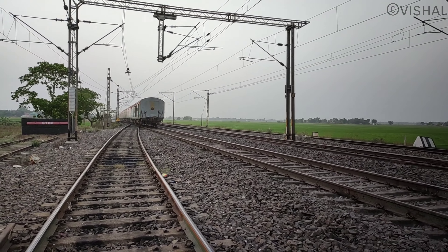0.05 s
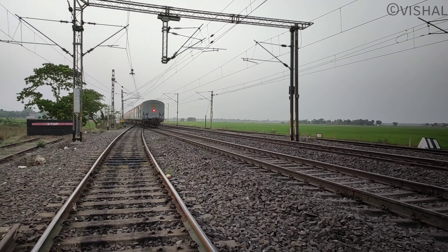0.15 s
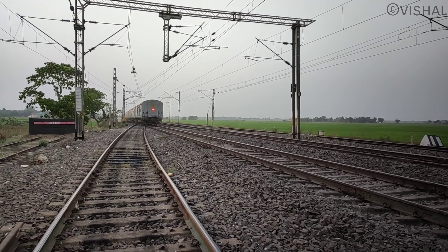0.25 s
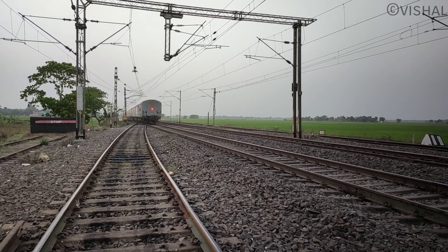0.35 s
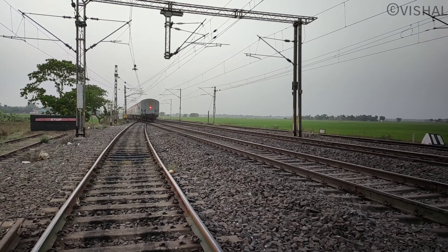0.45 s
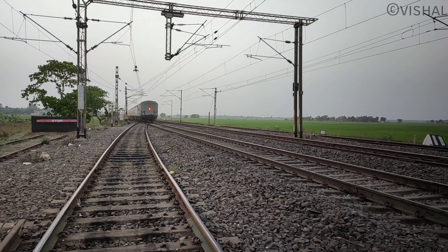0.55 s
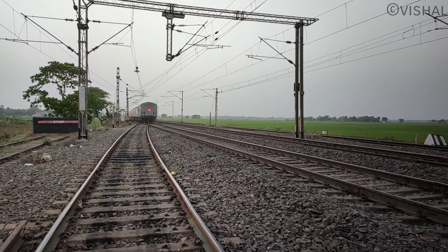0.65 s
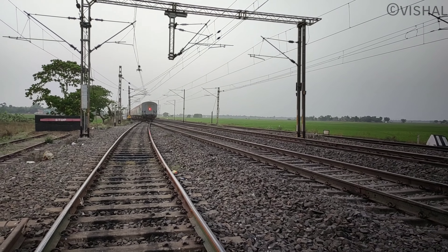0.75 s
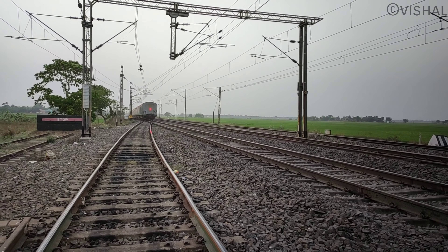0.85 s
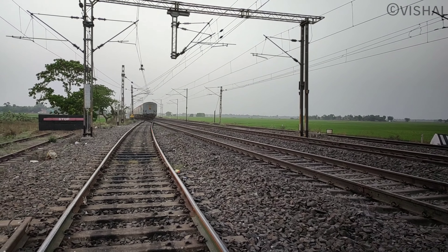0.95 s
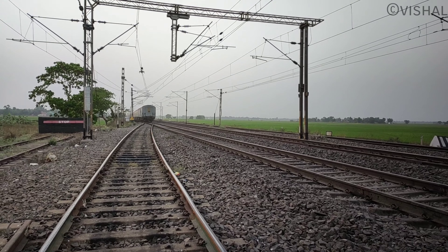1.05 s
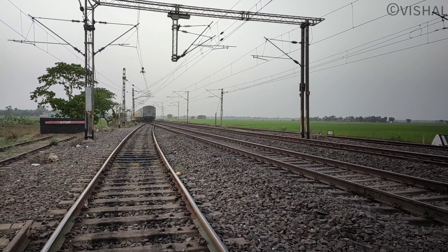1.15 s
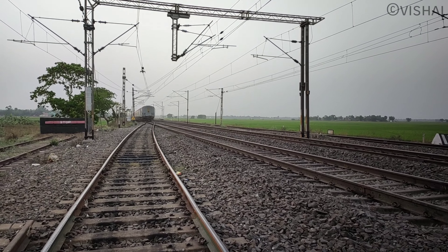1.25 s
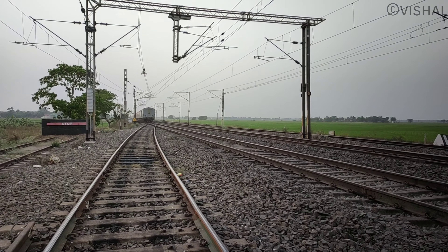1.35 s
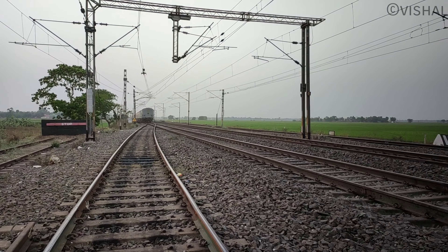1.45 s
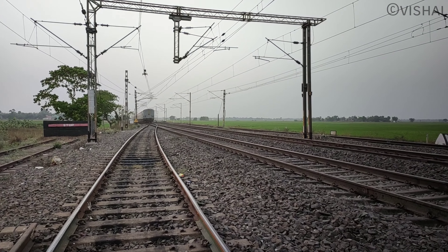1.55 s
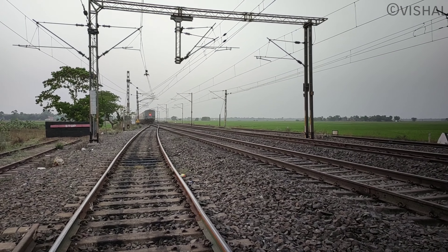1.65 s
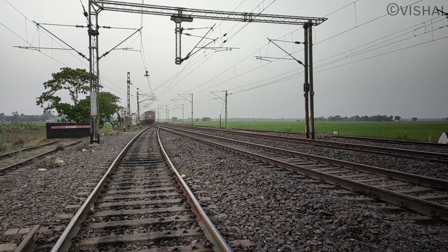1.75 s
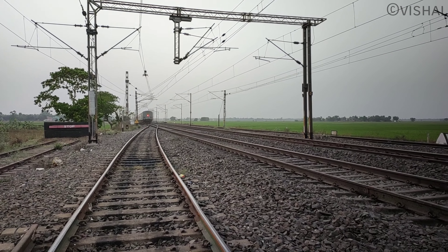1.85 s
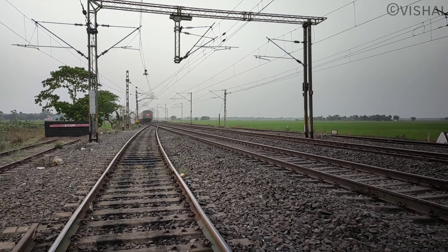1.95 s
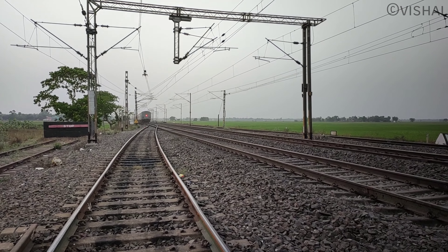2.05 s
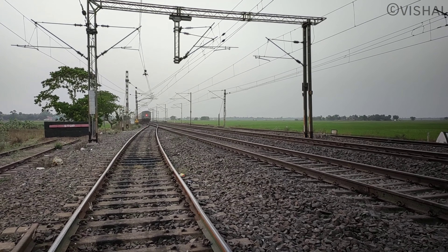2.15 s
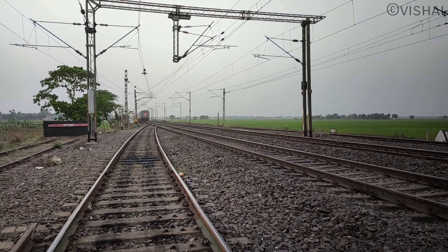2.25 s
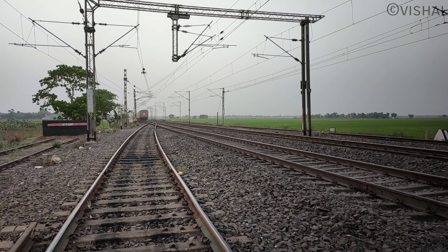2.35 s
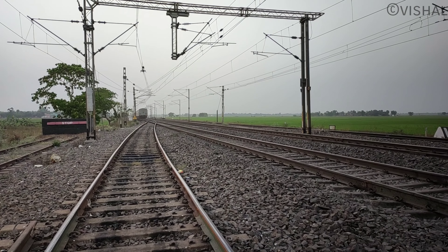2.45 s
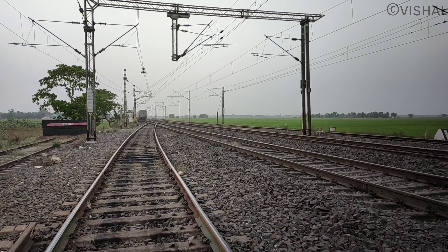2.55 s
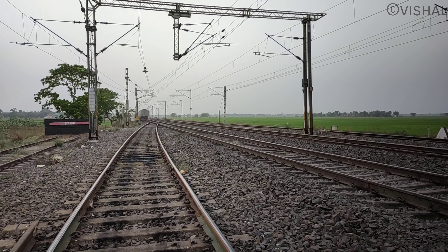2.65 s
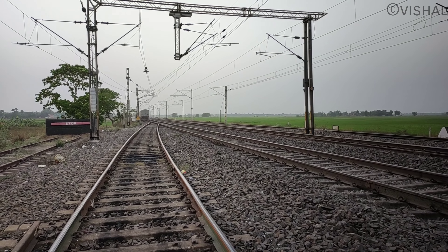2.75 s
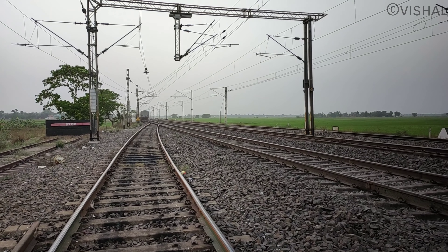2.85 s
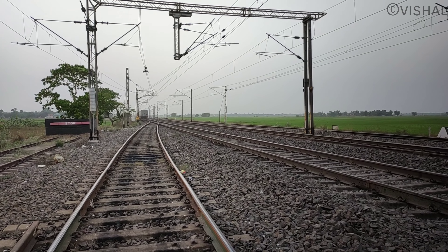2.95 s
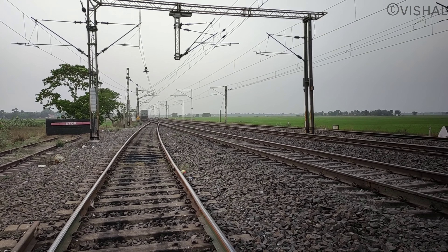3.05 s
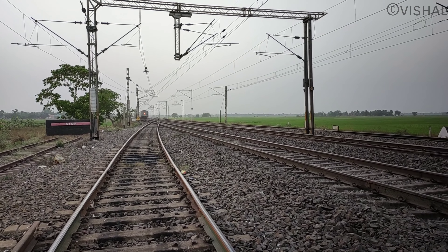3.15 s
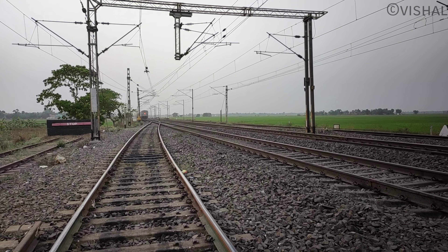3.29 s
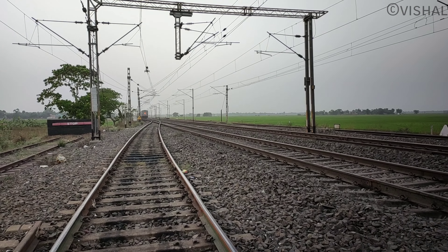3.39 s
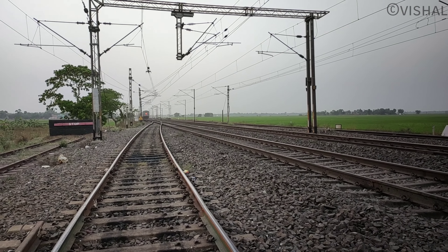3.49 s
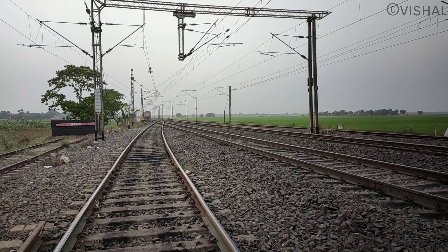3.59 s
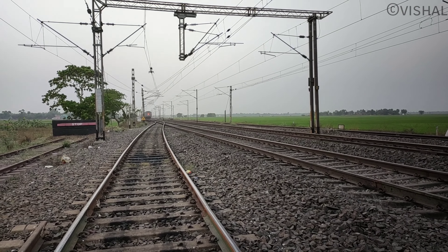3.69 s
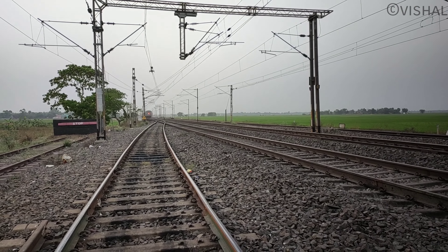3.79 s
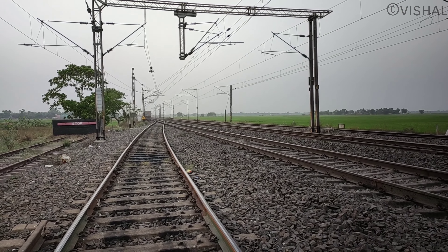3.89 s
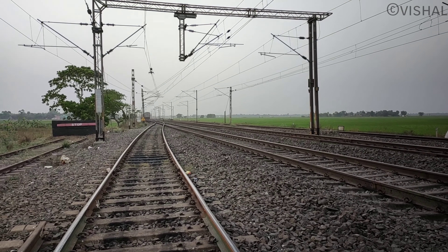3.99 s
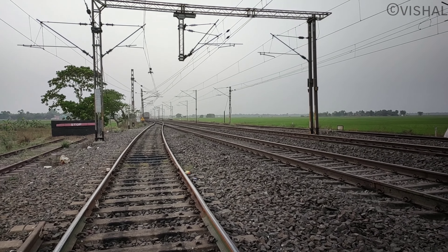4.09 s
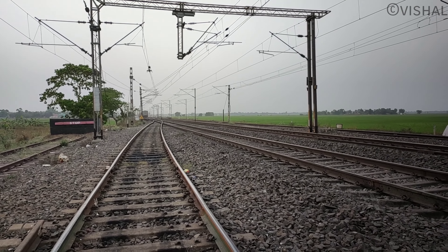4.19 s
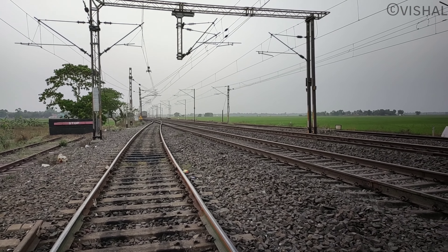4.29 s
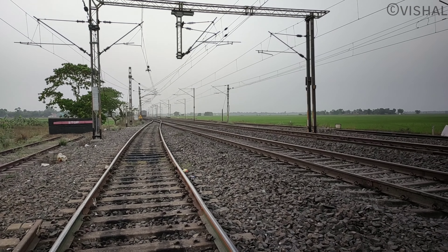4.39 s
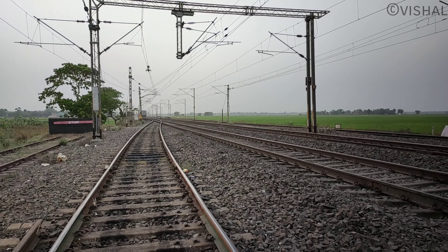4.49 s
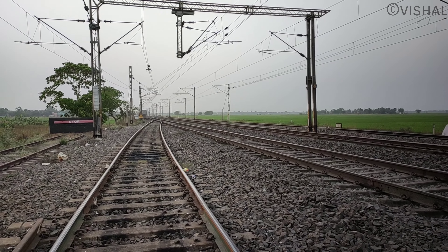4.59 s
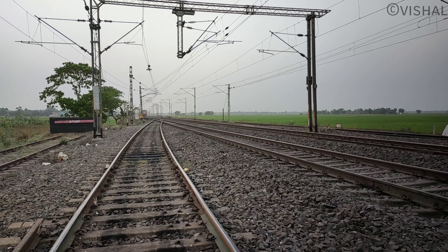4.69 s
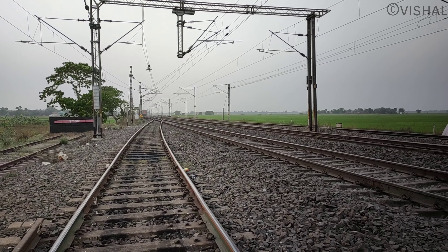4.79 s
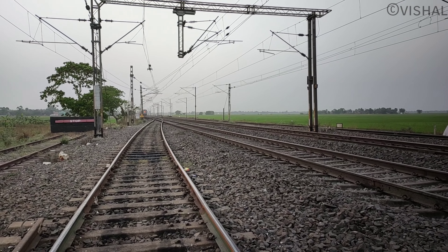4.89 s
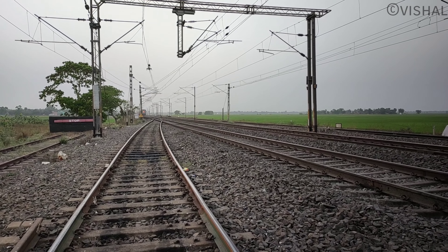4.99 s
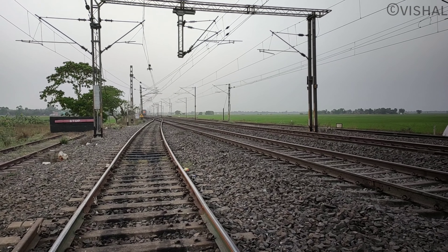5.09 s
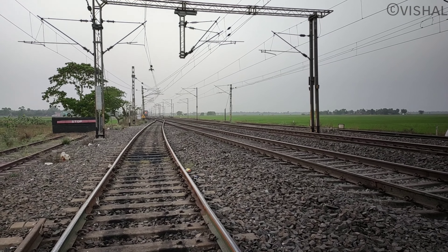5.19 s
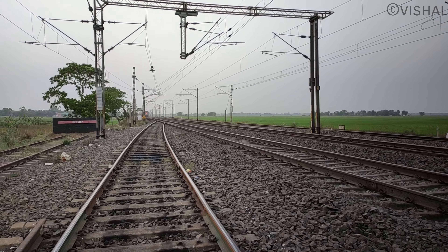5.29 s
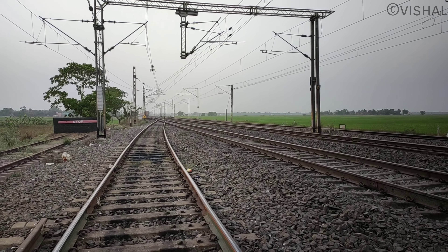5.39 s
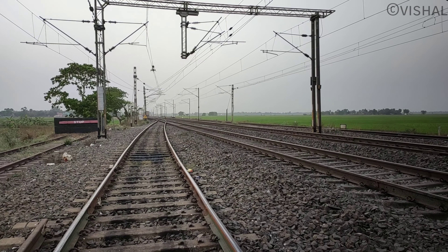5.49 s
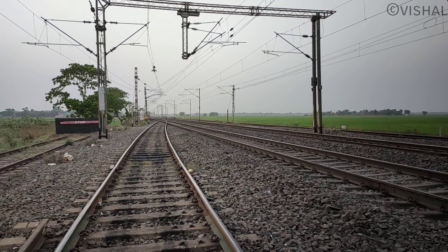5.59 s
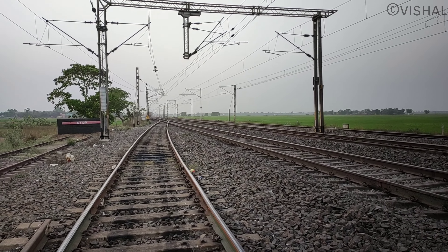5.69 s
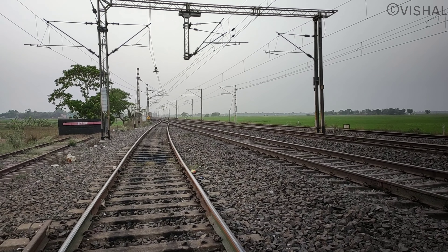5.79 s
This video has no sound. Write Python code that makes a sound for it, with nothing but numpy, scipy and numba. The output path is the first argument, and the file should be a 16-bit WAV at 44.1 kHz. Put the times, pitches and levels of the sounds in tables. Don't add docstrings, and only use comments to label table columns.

```python
import sys
import numpy as np
from scipy import signal
from scipy.io import wavfile
from numba import njit

SR = 44100
rng = np.random.default_rng(int(sys.argv[2]) if len(sys.argv) > 2 else 0)


def magnitude_from_level(level_db):
    exponent = np.asarray(level_db, float) / 20
    return 10 ** exponent


def master_out(mix):
    frames = np.transpose(np.atleast_2d(mix))
    ceiling = np.clip(frames, -1, 1)
    pcm = np.round(ceiling * 32767).astype(np.int16)
    wavfile.write(sys.argv[1], SR, pcm)


N = 257544


def rms_one(x):
    return x / np.sqrt(np.mean(x ** 2, axis=-1, keepdims=True) + 1e-20)


def in_time(rows):
    s, *columns = np.transpose(rows)
    return [np.interp(np.arange(N) / SR, s, column) for column in columns]


def at_hz(points, hz):
    table_hz, value = np.transpose(points)
    return np.interp(np.log(hz), np.log(table_hz), value)


def drift(rate_hz):
    r = np.exp(-40 * np.pi * rate_hz / SR)
    settle = 2000
    white = rng.standard_normal(N // 20 + settle + 2)
    slow = signal.lfilter([1], [1, -2 * r, r * r], white)[settle:]
    return np.interp(np.arange(N) / 20, np.arange(len(slow)), rms_one(slow))


def swells(times, heights, rise_s, fall_s):
    marks = np.zeros(N)
    marks[(np.array(times) * SR).astype(int).clip(0, N - 1)] = heights
    t = np.arange(int(6 * fall_s * SR)) / SR
    shape = (1 - np.exp(-t / rise_s)) * np.exp(-t / fall_s)
    return signal.fftconvolve(marks, shape / shape.max())[:N]


# (time [s], level [dB])
ROLLING = [(0.0, -27), (0.2, -27.5), (0.4, -29), (0.6, -26), (0.85, -31), (1.6, -32), (2.6, -32.5),
           (3.6, -30), (4.3, -32), (5.0, -34), (5.3, -37.5), (5.84, -37)]
# (frequency [Hz], level [dB per Hz])
NEAR_SPECTRUM = [(200, -7.5), (450, 4), (900, -1.5), (1400, -3), (2000, 3.5), (3000, -11.5), (4200, -8.5),
                 (5500, -13), (7500, -16), (11000, -28), (15000, -21)]
# (frequency [Hz], left-right likeness [0 to 1])
COHERENCE = [(200, 1), (900, 1), (2000, 0.13), (4000, 0.07), (6000, 0.05), (15000, .05)]
# (frequency [Hz], level [dB per Hz])
COACH_RUSH = [(4000, -22), (6500, -27), (11000, -11), (13500, -9), (15000, -16)]


def train():
    t = np.arange(N) / SR
    roll_db, = in_time(ROLLING)
    loss_db = -3.5 + 32.5 * (1 - np.exp(-t / 2.49))
    clack_db, clack_tilt_db = joint_clacks()
    rush_fade_db = 25 * np.maximum(t - 0.31, 0)
    together = drift(9)
    edges = 180 * 2 ** (np.arange(20) / 3)
    white = rng.standard_normal((2, 2, N))
    out = 0
    for k, (low, high) in enumerate(zip(edges, edges[1:])):
        band = signal.butter(3, [low, high], "band", fs=SR, output="sos")
        mid, side = signal.sosfilt(band, white[k % 2])
        hz = np.sqrt(low * high)
        rush = magnitude_from_level(at_hz(COACH_RUSH, hz) - rush_fade_db)
        roar = magnitude_from_level(at_hz(NEAR_SPECTRUM, hz) - loss_db * (hz / 7000) ** 1.058)
        joint_db = clack_db + clack_tilt_db * np.log2(min(hz, 3500) / 2000)
        if hz > 5000:
            joint_db = joint_db - 0.29 * clack_db
        flutter_db = 0.5 * together + 0.78 * drift(23)
        gain = np.hypot(rush, roar) * magnitude_from_level(joint_db + flutter_db)
        alike = np.clip(at_hz(COHERENCE, hz), 0, 1)
        out = out + gain * (np.sqrt(1 + alike) * mid + np.sqrt(1 - alike) * side * [[1], [-1]])
    left, right = magnitude_from_level(roll_db) * (magnitude_from_level(10) * out + magnitude_from_level(-0.15 * loss_db) * singing(clack_db))
    return at_ports(left, right)


# (frequency [Hz], width [Hz], level over the rolling noise [dB])
STEEL_MODES = [(410, 11, -13), (581, 10, -17), (888, 45, -18.5), (1659, 36, -12), (1919, 38, -13),
               (2150, 48, -15), (2738, 14, -29.5), (3434, 13.3, -30.5)]


def singing(clack_db):
    white = rng.standard_normal(N)
    out = 0
    for hz, width_hz, db in STEEL_MODES:
        r = np.exp(-np.pi * width_hz / SR)
        mode = [0.93, 0.0045, -0.955, 1, -2 * r * np.cos(2 * np.pi * hz / SR), r * r]
        level_db = db + 4.44 * drift(9.4) + 0.72 * clack_db
        out = out + magnitude_from_level(level_db) * rms_one(signal.sosfilt([mode, mode], white))
    return out


def peaks(x, table):
    hz, width_hz, db = np.transpose(table)
    c, a, q = -2 * np.cos(2 * np.pi * hz / SR), magnitude_from_level(db / 2), np.pi * width_hz / SR
    sos = np.transpose([1 + q * a, c, 1 - q * a, 1 + q / a, c, 1 - q / a])
    return signal.sosfilt(np.ascontiguousarray(sos / sos[:, 3:4]), x)


# (frequency [Hz], width [Hz], level [dB])
ECHOES_LEFT = [(650, 130, -13.5), (880, 360, 5), (1276, 244, -7), (1675, 160, 3), (1914, 130, 4.5),
               (2180, 51, 3.5), (1940, 1500, -1.5), (2660, 610, 3), (2740, 54, -5.5), (3390, 250, 1),
               (3930, 200, 2.5), (4560, 370, -10.5), (12300, 2600, 3.5)]
ECHOES_RIGHT = [(770, 120, -9.5), (935, 100, 5), (1186, 460, -8.5), (1720, 170, 1), (2184, 197, -10.5),
                (2370, 270, 10), (2590, 210, 5.5), (2780, 280, -2), (3450, 470, 4.5), (3640, 200, -3),
                (4173, 214, 8.5), (4740, 110, 3.5), (5300, 260, -11.5), (7600, 1200, 5), (13700, 1300, -22)]


def at_ports(left, right):
    lag_s = 0.0001
    left = np.interp(np.arange(N) - lag_s * SR, np.arange(N), left)
    return np.array([peaks(left, ECHOES_LEFT), peaks(right, ECHOES_RIGHT)])


# (time [s], length [s], rumble level [dB], buffet level [dB])
LEFT_GUSTS = [(0.0, 0.3, -1, -12.5), (.2, 0.28, -20, -24.5), (.37, .2, -16, -11.5), (.56, 0.38, 4, -20.5),
              (.71, 0.27, 18.5, -15), (.87, .25, 5.5, -16.5), (1.0, 0.16, -20, -13.5),
              (1.09, 0.17, -3, -17), (1.17, 0.21, -13, -9.5), (1.42, 0.35, -6.5, -15),
              (1.59, .15, -10, -19), (1.68, 0.086, -11, -14), (1.78, 0.16, -11, -11.5),
              (1.91, 0.19, -11.5, -14.5), (2.09, 0.18, -22, -14), (2.18, 0.19, -6, -35),
              (2.5, 0.27, -23, -24.5), (2.59, 0.2, -13.5, -28.5), (2.67, 0.21, -23, -27.5),
              (2.79, 0.35, -12, -18), (3.15, 0.23, -15.5, -21), (3.7, 0.36, -17, -44),
              (3.83, .17, -6.5, -14.5), (3.92, 0.27, -12.5, -15.5), (4.09, 0.22, -13.5, -33.5),
              (4.41, 0.31, -15.5, -32), (4.6, 0.32, -22, -40), (4.79, 0.21, -12.5, -23.5),
              (5.03, 0.39, -22.5, -39), (5.33, 0.29, -32, -51)]
RIGHT_GUSTS = [(.22, 0.56, -19.5, -13.5), (.42, 0.093, -14, -5.5), (.5, 0.34, 2.5, -5),
               (.62, 0.067, -4.5, -11.5), (.78, 0.56, 5, 0), (1.0, 0.27, 10, 1), (1.12, 0.32, 9, -5.5),
               (1.29, 0.2, -9.5, -4), (1.52, 0.43, -12, -16), (1.68, 0.11, -25, -17), (1.79, 0.52, -8, -10),
               (2.0, 0.17, -9, -10.5), (2.09, 0.24, -7, -16), (2.335, .17, -16.5, -13),
               (2.5, 0.22, -13.5, -16), (2.71, 0.2, -13, -15.5), (2.92, 0.11, -22, -50),
               (3.17, .15, -40, -30), (3.35, 0.22, -22, -26.5), (3.9, 0.32, -14, -13),
               (4.03, 0.14, -4, -20), (4.17, 0.21, -23, -13.5), (4.25, 0.25, -13.5, -21.5),
               (4.47, 0.17, -6, -16), (4.65, 0.22, -31, -17), (4.79, 0.27, -9.5, -22),
               (4.92, 0.23, -18, -18), (5.13, 0.36, -25.5, -32.5), (5.63, 0.2, -25, -25.5),
               (5.78, 0.28, -20, -31)]
# (rumble at first [dB], slope [dB/s], buffet at first [dB], slope [dB/s])
LEFT_LULL = (-21.5, -2.5, -21.5, -8)
RIGHT_LULL = (-23.5, -3, -16, -5.5)
# (corner at full scale [Hz], power of the buffet [1], lowest corner [Hz])
LEFT_CORNER = (352, 0.2, 63)
RIGHT_CORNER = (860, 0.45, 280)


def gusts(table, lull, corner):
    t = np.arange(0, N + 64, 64) / SR
    s, length_s, rumble_db, buffet_db = np.transpose(table)
    bump = np.cos(np.pi * np.clip((t[:, None] - s) / length_s, -0.5, 0.5)) ** 2
    rumble = magnitude_from_level(lull[0] + lull[1] * t) + bump @ magnitude_from_level(rumble_db)
    buffet = magnitude_from_level(lull[2] + lull[3] * t) + bump @ magnitude_from_level(buffet_db)
    corner_hz = np.maximum(corner[0] * buffet ** corner[1], corner[2])
    return in_time(np.transpose([t, 20 * np.log10(rumble), 20 * np.log10(buffet), corner_hz]))


@njit
def moving_lowpass(x, share):
    out, a, b, c, d = np.empty_like(x), 0., 0., 0., 0.
    for i in range(len(x)):
        a += share[i] * (x[i] - a)
        b += share[i] * (a - b)
        c += share[i] * (b - c)
        d += share[i] * (c - d)
        out[i] = d
    return out


def turbulence(corner_hz, low_hz, grit_db):
    share = 1 - np.exp(-2 * np.pi * np.clip(corner_hz, 30, 9000) / SR)
    kicks = rng.standard_normal(N) * magnitude_from_level(grit_db * np.minimum(rng.exponential(1, N), 8))
    even = moving_lowpass(kicks, share) / np.sqrt(share)
    return rms_one(signal.sosfilt(signal.butter(2, low_hz, "high", fs=SR, output="sos"), even))


def wind(air, lumps_db):
    rumble_db, buffet_db, corner_hz = air
    throb_db = 2.2 * drift(14)
    rumble = magnitude_from_level(rumble_db + throb_db) * turbulence(np.full(N, 115.), low_hz=8.4, grit_db=0.5)
    rumble = 0.85 * np.tanh(rumble / 0.85)
    lumps = lumps_db * drift(50)
    buffet_hz = 1.465 * corner_hz * magnitude_from_level(0.67 * lumps)
    buffet = magnitude_from_level(buffet_db - 6.5 + lumps) * turbulence(buffet_hz, low_hz=92, grit_db=3.0)
    return rumble + buffet


def whistle(level_db, hz, width_hz):
    band = signal.butter(1, [hz - width_hz / 2, hz + width_hz / 2], "band", fs=SR, output="sos")
    ringing = signal.sosfilt(band, signal.sosfilt(band, rng.standard_normal(N)))
    return magnitude_from_level(level_db + 1.4 * drift(21)) * rms_one(ringing)


# (time [s], left level [dB], right level [dB])
WHISTLING = [
    (0, -21.5, -16.5),
    (.2, -26.5, -25.5),
    (.4, -27, -11.5),
    (.5, -23, -11),
    (.7, -46, -43),
    (1.0, -56, -25),
    (1.3, -79, -78),
]


def whistles():
    left_db, right_db = in_time(WHISTLING)
    return np.array([whistle(left_db, hz=920, width_hz=450), whistle(right_db, hz=600, width_hz=160)])


def hiss():
    dull = signal.butter(4, 12000, fs=SR, output="sos")
    return magnitude_from_level(-67) * signal.sosfilt(dull, rng.standard_normal((2, N)))


# (time [s], rise over the rolling noise [dB], tilt of that rise [dB per octave])
AXLE_HITS = [(.05, 0, 1), (.33, 1, 0.5), (1.28, 4, 2.5), (1.45, -0.5, 1.5), (1.605, -1, 7.5), (1.68, 1, 3),
             (1.96, 3, 2.5), (2.12, -2, 4.5), (2.42, 4, 1.5), (2.49, 0.5, 3.5), (2.72, 2, 3),
             (2.79, 1.5, 1.5), (3.08, 4, -0.3), (3.16, 3.5, 2), (3.22, -1, 1.5), (3.8, 1.5, -2.5),
             (3.92, -1, -4.5), (4.205, 8.5, 1.5), (4.33, 1, -3), (4.54, 5, 1), (4.94, 5.5, 0.5),
             (5.01, 4.5, -1), (5.2, 7, 1.5), (5.38, 6.5, -1), (5.435, 6, 0.5), (5.57, 4.5, 3),
             (5.635, 8.5, 4.5), (5.82, 4.5, 3)]


def joint_clacks():
    s, rise_db, tilt_db = np.transpose(AXLE_HITS)
    return [swells(s, db, rise_s=0.0032, fall_s=0.053) for db in (rise_db, tilt_db)]


# (time [s], level [dB])
LEFT_EDDIES = [(0.119, -18.5), (0.176, -28), (0.29, -15.5), (0.631, -22), (0.656, -30), (0.731, -31),
               (0.758, -29), (0.8, -16), (0.869, -8.5), (1.044, -11.5), (1.266, -18.5), (1.381, -41),
               (1.467, -17.5), (1.618, -16.5), (1.679, -22), (1.772, -19.5), (2.086, -48), (2.19, -20),
               (2.215, -24.5), (2.277, -23.5), (2.521, -54), (2.608, -25), (3.299, -26), (3.484, -31.5),
               (3.729, -23.5), (3.87, -34), (3.914, -36), (4.217, -37), (4.936, -25.5), (5.032, -39)]
RIGHT_EDDIES = [(0.424, -9), (0.5, -10), (0.538, -4.5), (0.609, -4), (0.687, -3.5), (0.709, -5),
                (0.73, -8.5), (0.792, -6), (0.808, -1), (0.925, -4.5), (0.943, -8), (1.013, -9),
                (1.05, -13.5), (1.075, -9.5), (1.111, -10.5), (1.292, -8), (1.712, -15), (1.807, -11.5),
                (1.878, -14), (1.981, -19), (2.06, -16), (2.335, -23.5), (2.709, -21.5), (3.848, -22.5),
                (3.915, -13.5), (3.967, -15.5), (4.039, -15.5), (4.392, -18.5), (4.484, -28), (4.81, -30)]


def eddies(table, eddy_hz):
    s, db = np.transpose(table)
    burst = np.abs(swells(s - 0.004, magnitude_from_level(db), rise_s=0.00059, fall_s=0.018))
    corner_hz = eddy_hz * (burst / 0.18 + 0.057) ** 0.59
    return 1.29 * burst * turbulence(corner_hz, low_hz=102, grit_db=5.5)


# (time [s], length [s], signed pressure over full scale [1])
LEFT_SURGES = [(.474, .012, -3), (.515, .008, -3), (.592, .022, 2), (.616, .017, -3), (.707, .004, 2),
               (.723, .012, 3), (.744, .026, -3), (.773, .01, 3), (.815, .006, 3), (.83, .008, -3),
               (.875, .007, -3), (.894, .009, -3), (1.001, .008, -2)]
RIGHT_SURGES = [
    (.431, .006, -3),
    (.797, .005, 3),
    (.818, .007, -3),
    (1.072, .004, 3),
    (1.807, .003, -1.5),
    (3.919, .003, -1.2),
    (4.035, .001, 1.2),
]


def surges(table):
    out = np.zeros(N)
    for s, length_s, push in table:
        t = np.arange(-length_s * SR - 300, length_s * SR + 300) / SR
        at = round((s + t[0]) * SR)
        out[at:at + len(t)] += push * np.exp(-(t / (0.5 * length_s + 0.0007)) ** 4)
    return out


def scene():
    left = wind(gusts(LEFT_GUSTS, LEFT_LULL, LEFT_CORNER), lumps_db=3.0)
    left = left + eddies(LEFT_EDDIES, eddy_hz=950) + surges(LEFT_SURGES)
    right = wind(gusts(RIGHT_GUSTS, RIGHT_LULL, RIGHT_CORNER), lumps_db=2.6)
    right = right + eddies(RIGHT_EDDIES, eddy_hz=1090) + surges(RIGHT_SURGES)
    return train() + np.array([left, right]) + whistles() + hiss()


def top_cut(x):
    return signal.sosfilt(signal.butter(12, 15660, fs=SR, output="sos"), x)


def record(dry):
    knee = 120.0
    flat = dry / (1 + np.abs(dry) ** knee) ** (1 / knee)
    return top_cut(flat)


dry = scene()
out = record(dry)
master_out(out)
```